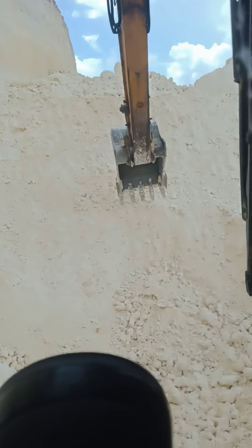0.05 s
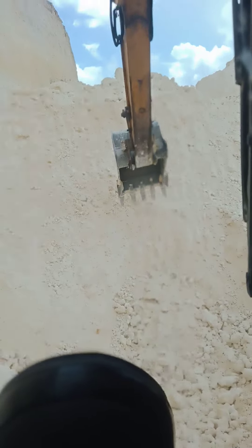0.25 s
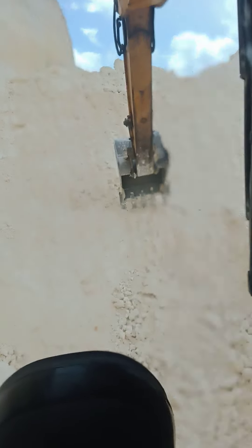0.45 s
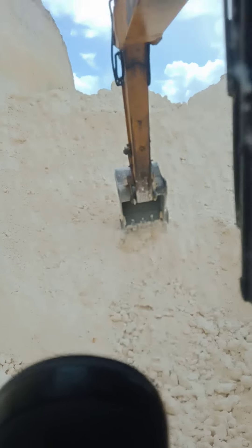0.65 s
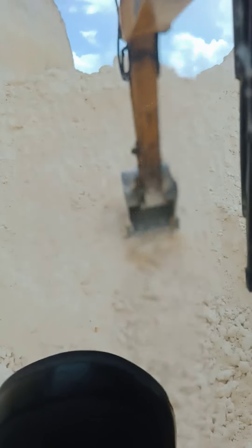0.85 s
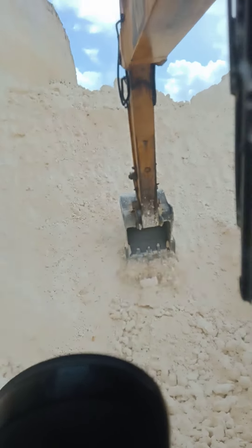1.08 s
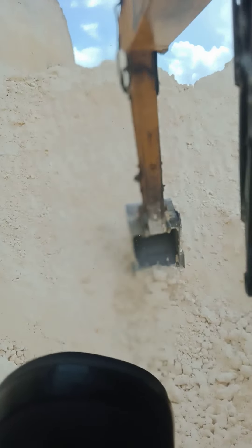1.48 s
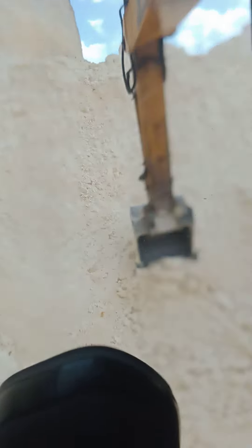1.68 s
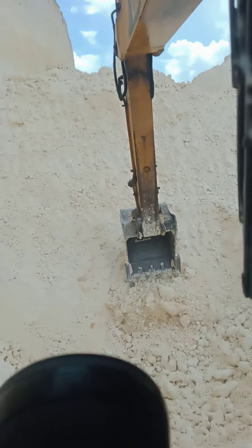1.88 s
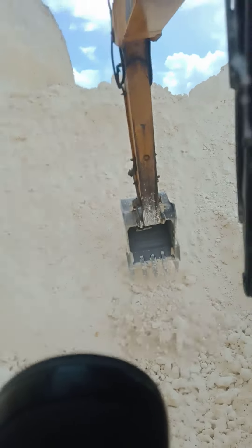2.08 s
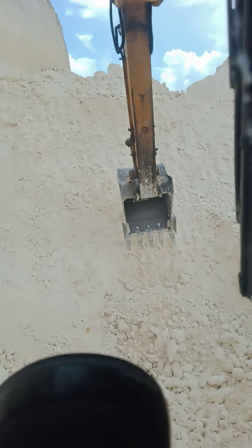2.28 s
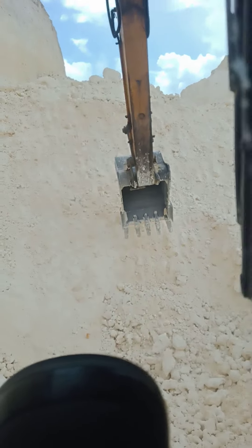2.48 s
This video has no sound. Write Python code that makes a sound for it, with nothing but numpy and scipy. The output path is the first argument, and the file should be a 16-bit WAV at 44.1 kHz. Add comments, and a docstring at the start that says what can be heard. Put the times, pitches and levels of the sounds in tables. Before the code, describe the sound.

Heard from inside the cab, a digger bucket scrapes into soil and stones while the diesel engine rumbles. Gravel crunches, lumps thud and steel clinks, with one loud clank, a short dip and a last slide of earth.

```python
"""An excavator bucket drags through loose stony earth, heard from the cab over the diesel engine.
Grit crunches, soil tumbles and sand ticks as the teeth bite; stones crack on the steel, clods thud.
A hard bite rings the teeth, a big rock clanks on the shell, a loose steel joint clinks now and then.
Near 1.9 s the digging and the engine briefly go quieter; a last slide of earth follows."""
import sys
import numpy as np
from scipy import signal
from scipy.fft import rfft, irfft, next_fast_len
from scipy.io import wavfile

SR = 44100
rng = np.random.default_rng(int(sys.argv[2]) if len(sys.argv) > 2 else 0)


def dump_mix(stems):
    """Bounce the given channels to the path in sys.argv[1] as a 16-bit WAV at rate SR."""
    frames = np.atleast_2d(stems).T  # one column per channel
    limited = np.clip(frames, -1, 1)  # hard clip at full scale
    pcm = np.round(limited * 32767).astype(np.int16)
    wavfile.write(sys.argv[1], SR, pcm)


N = 116865

# Spectra. Each row: frequency in Hz, relative density in dB.
ENGINE_SPECTRUM = [(20, -23), (45, -11.5), (85, 4.5), (130, -16), (180, -25), (260, -18.5), (500, -12.5),
                   (900, -18), (1600, -26), (3000, -38.5), (6300, -34), (7300, -57), (8400, -48),
                   (11000, -57), (13800, -50), (16000, -79)]
GROUND_SPECTRUM = [(15, -58), (28, -21), (38, 10.5), (70, 12), (95, 2), (135, 10.5), (175, -3), (400, -44),
                   (2500, -82)]
SOIL_SPECTRUM = [(60, -21.5), (170, -2), (230, 0.5), (330, 0), (420, -5), (500, -2), (660, -3.5),
                 (850, -4.5), (1300, -12), (2000, -17), (5000, -53), (10000, -69)]
GRIT_SPECTRUM = [(300, -44.5), (900, 5.5), (1500, 1), (2300, 0), (3500, -1), (4500, -3.5), (5900, 1.5),
                 (6600, -1.5), (7300, -19.5), (8600, -27), (10000, -44), (12000, -52), (14300, -30),
                 (16000, -58)]
SAND_SPECTRUM = [(4000, -15), (6200, 1), (7400, 9.5), (8500, 7.5), (9500, -6.5), (10300, -5),
                 (11500, -14.5), (12800, -7), (13800, 2), (14800, 3), (16000, -16)]
STONE_ON_STEEL_SPECTRUM = [(200, -19), (800, 16.5), (2000, 4.5), (4500, -1), (6200, 3.5), (7200, -7.5),
                           (8600, -14), (10000, -20), (12000, -36), (14300, -18), (16000, -22)]
# Engine tones. Each row: multiple of the firing rate, relative level in dB.
ENGINE_ORDERS = [(.5, -16), (1, 12), (2, -38.5)]
# Engine envelope. Each row: time in seconds, gain in dB.
ENGINE_GAIN = [(0, 2), (.4, 2), (1.85, 6), (1.93, -5), (2.03, -2), (2.1, 2), (2.65, -1.5)]
# Loose joint. Each row: ratio to the clink pitch, relative level in dB, T60 in seconds.
JOINT_MODES = [(1, -1.5, 0.099), (1.07, -4.5, 0.071), (.92, -12, 0.11)]
# Joint knocks. Each row: start in seconds, level in dB, pitch in Hz.
JOINT_CLINKS = [(.004, -41.5, 972), (.113, -39.5, 952), (.246, -34.5, 967), (0.33, -43, 1010),
                (.407, -32.5, 1000), (0.989, -39.5, 972), (1.606, -27.5, 1057), (2.228, -41.5, 1060),
                (2.477, -39, 1010)]
# Bucket steel. Each row: frequency in Hz, relative level in dB, T60 in seconds.
TEETH_MODES = [(1340, 0.5, 0.24), (2541, -7, 0.18), (2720, 1.5, 0.23), (2850, -9, .14), (3390, 3.5, 0.15),
               (3840, -7, 0.096)]
SHELL_MODES = [(985, 0, .07), (1060, -8, .05), (505, -12, .06)]
# Chips off the steel. Each row: start in seconds, level in dB.
FLYING_CHIPS = [(.092, -63), (.668, -70), (0.876, -46.5), (1.056, -51), (1.286, -51), (1.5, -61),
                (1.607, -51), (1.7, -57), (1.738, -49), (1.843, -67), (2.16, -54)]
# Clods and rocks landing. Each row: start in seconds, level in dB, pitch in Hz, decay in seconds.
CLOD_THUDS = [(.435, -33.5, 350, 0.051), (.48, -24, 111, 0.032), (.485, -33, 513, 0.038),
              (.553, -30.5, 268, .015), (.61, -26, 93.6, 0.044), (.616, -32.5, 516, .01),
              (.655, -27.5, 83, 0.016), (.675, -36, 244, 0.023), (.777, -23, 237, 0.013),
              (1.056, -29, 87, 0.044), (1.06, -34, 516, 0.024), (1.19, -28, 218, 0.024),
              (1.266, -29, 83.5, .04), (1.27, -32, 485, 0.027), (1.478, -39, 317, .015),
              (1.605, -28.5, 752, .02), (1.612, -23.5, 284, 0.029), (1.645, -28, 533, 0.05),
              (1.715, -34, 135, .025), (1.723, -29, 550, 0.029), (1.803, -29.5, 267, 0.01),
              (1.924, -33.5, 233, 0.019), (2.072, -39.5, 313, 0.031), (2.295, -42, 580, 0.019),
              (2.51, -43, 261, 0.014)]
# Stones breaking. Each row: start in seconds, level in dB, band centre in Hz, decay in seconds.
STONE_CRACKS = [(0.03, -52, 5450, 0.032), (.25, -47.5, 2560, 0.014), (.368, -50, 4630, 0.027),
                (0.563, -39.5, 3860, 0.013), (0.613, -31.5, 6140, 0.0056), (.641, -30.5, 3700, 0.011),
                (.661, -34, 2800, 0.019), (0.789, -43.5, 6200, 0.02), (0.8462, -39, 2500, 0.0056),
                (.877, -34.5, 4220, 0.013), (1.057, -31, 6530, 0.0089), (1.082, -31, 3900, 0.0069),
                (1.118, -37, 2080, 0.013), (1.175, -39.5, 6500, 0.017), (1.267, -28, 4200, 0.0038),
                (1.288, -33, 4500, 0.012), (1.393, -38, 6100, 0.0089), (1.413, -31, 1840, 0.014),
                (1.477, -42, 3830, 0.0087), (1.587, -37.5, 6550, 0.012), (1.607, -27.5, 1940, 0.0076),
                (1.643, -28, 4170, 0.013), (1.7204, -34, 5680, 0.039), (1.787, -40.5, 5000, 0.013),
                (2.028, -53.5, 4730, .012), (2.074, -45, 5700, 0.011), (2.123, -35.5, 3390, .017),
                (2.224, -50.5, 3500, 0.033), (2.358, -46.5, 5000, 0.0078), (2.58, -49.5, 2020, 0.014)]
# Dig envelopes. Each row: time in seconds, then grit, soil and ground levels in dB.
DIG_LEVELS = [(0, -62, -50.5, -51), (.2, -58, -51.5, -45), (.26, -67, -42.5, -54), (.32, -59, -48.5, -56),
              (0.421, -58.5, -47.5, -57), (.49, -41, -32.5, -33), (.57, -46, -40, -34.5),
              (.67, -41, -36, -51), (.73, -53, -42, -47), (.79, -42.5, -34, -42), (.89, -44, -35.5, -38),
              (1.01, -54, -43, -41), (1.1, -45, -41, -50), (1.19, -47, -35.5, -35.5),
              (1.31, -39, -36.5, -36), (1.38, -50, -41, -36), (1.42, -45, -35, -43),
              (1.52, -39, -32.5, -38), (1.585, -44, -37, -39.5), (1.63, -35, -34, -34),
              (1.75, -41.5, -33.5, -39), (1.8, -46.5, -36, -46), (1.883, -43.5, -36.5, -38),
              (1.913, -56.5, -46.5, -52), (2.0, -63, -51, -51), (2.06, -63, -43.5, -63),
              (2.09, -52, -36.5, -40.5), (2.15, -42.5, -40, -37), (2.21, -53.5, -47, -44),
              (2.25, -46.5, -39, -41), (2.31, -48, -40, -42), (2.37, -55.5, -43.5, -40),
              (2.43, -61, -46.5, -51), (2.51, -58, -44, -48), (2.59, -56.5, -45, -52),
              (2.65, -60, -50.5, -48)]
GRIT_COLUMN, SOIL_COLUMN, GROUND_COLUMN = 1, 2, 3


def amp(db):
    """Decibels to gain."""
    return 10 ** (np.asarray(db) / 20)


def unit(x):
    """Scale to rms 1."""
    return x / np.sqrt(np.mean(x ** 2) + 1e-20)


def add(mix, start_s, sound):
    """Mix a sound in at start_s."""
    part = mix[max(0, round(start_s * SR)):][:len(sound)]
    part += sound[:len(part)]


def colour(x, spectrum):
    """Minimum-phase filter with the given spectrum."""
    size = next_fast_len(len(x) + 4096)
    hz, db = np.transpose(spectrum)
    bin_hz = abs(np.fft.fftfreq(size, 1 / SR))
    log_gain = np.log(amp(np.interp(np.log(bin_hz + 1), np.log(hz), db)))
    response = np.exp(np.conj(signal.hilbert(log_gain)))
    return np.fft.ifft(np.fft.fft(x, size) * response).real[:len(x)]


def band(x, hz, q):
    """One resonance; centre and width capped at SR / 4."""
    return signal.lfilter(*signal.iirpeak(min(hz, SR / 4), max(q, hz / (SR / 4)), SR), x)


def drift(hz):
    """Random wander of rms 1, low-passed at hz."""
    rolloff = 1 + (np.fft.rfftfreq(N, 1 / SR) / hz) ** 4
    return unit(irfft(rfft(rng.standard_normal(N)) / rolloff, N))


def envelope(table, column=1):
    """Gain over time from a dB column."""
    rows = np.array(table)
    return amp(np.interp(np.arange(N) / SR, rows[:, 0], rows[:, column]))


def steel_ring(t, modes):
    """Struck steel: a sum of decaying sines."""
    return sum(amp(db - 60 * t / t60_s) * np.sin(2 * np.pi * hz * t) for hz, db, t60_s in modes)


def grains(per_s, spread_db, flurry_db, span_hz, q, bands):
    """Random small impacts; each pitch band has its own flurries."""
    out = np.zeros(N)
    knots = np.arange(0, N + 600, 600)
    for hz in np.geomspace(*span_hz, bands):
        sizes = amp(spread_db * np.minimum(rng.exponential(1, N), 3)) * rng.choice([-1, 1], N)
        flurry = amp(flurry_db * np.interp(np.arange(N), knots, rng.standard_normal(len(knots))))
        hits = rng.random(N) < per_s / bands / SR
        out += band(sizes * flurry * hits, hz, q) / np.sqrt(hz)
    return unit(out)


def cab(x, t60_s, wet_db, echoes_per_s=2000):
    """Add short reflections from the cab's glass and panels."""
    t = np.arange(SR // 4) / SR
    echoes = rng.standard_normal(len(t)) * (rng.random(len(t)) < echoes_per_s / SR)
    tail = echoes * (t > .002) * amp(-60 * t / t60_s)
    return x + amp(wet_db) * signal.fftconvolve(x, tail / np.linalg.norm(tail))[:N]


def engine(firing_hz=94.6, tone_db=-45.5, rattle_db=-49):
    """Diesel: wavering firing tone over a dull mechanical rattle."""
    cycles = np.cumsum(firing_hz * (1 + 0.031 * drift(hz=10.5))) / SR
    tone = sum(amp(db) * np.sin(2 * np.pi * (k * cycles + rng.random())) for k, db in ENGINE_ORDERS)
    rattle = unit(colour(rng.standard_normal(N) * amp(0.73 * drift(hz=50)), ENGINE_SPECTRUM))
    tone = unit(tone * amp(6.6 * drift(hz=23)))
    return envelope(ENGINE_GAIN) * (amp(tone_db) * tone + amp(rattle_db) * rattle)


def joint_clinks(rise_s=0.0018, grate_decay_s=0.013):
    """A slack steel joint knocks and grates with a short, rough ring."""
    t, out = np.arange(SR // 4) / SR, np.zeros(N)
    for start_s, db, hz in JOINT_CLINKS:
        ring = sum(amp(mode_db - 60 * t / t60_s) * np.sin(2 * np.pi * (hz * ratio * t + rng.random()))
                   for ratio, mode_db, t60_s in JOINT_MODES)
        noise = rng.standard_normal(len(t))
        grate = unit(band(band(noise, hz, q=12), hz, q=6.3)) * np.exp(-t / grate_decay_s)
        add(out, start_s, amp(db) * (ring + 0.56 * grate) * np.minimum(t / rise_s, 1))
    return out


def teeth_ring(start_s=.643, level_db=-39):
    """The first hard bite rings the bucket teeth."""
    t, out = np.arange(SR // 3) / SR, np.zeros(N)
    add(out, start_s, amp(level_db) * steel_ring(t, TEETH_MODES))
    return out


def shell_clank(start_s=1.679, level_db=-17.5, rise_s=0.0034):
    """One big rock drops on the bucket shell."""
    t, out = np.arange(SR // 6) / SR, np.zeros(N)
    add(out, start_s, amp(level_db) * steel_ring(t, SHELL_MODES) * np.minimum(t / rise_s, 1))
    return out


def sand(re_grit_db=-20.5, chip_decay_s=0.0094):
    """Sand ticks as it slides over the steel; a few sharper chips fly off."""
    t = np.arange(SR // 10) / SR
    ticks = grains(per_s=1700, spread_db=-0.5, flurry_db=3.5, span_hz=(6000, 15100), q=3.5, bands=8)
    slide = unit(colour(ticks * amp(3.5 * drift(hz=30)), SAND_SPECTRUM))
    out = amp(re_grit_db) * slide * envelope(DIG_LEVELS, GRIT_COLUMN)
    for start_s, db in FLYING_CHIPS:
        chip = unit(colour(rng.standard_normal(len(t)), SAND_SPECTRUM))
        add(out, start_s, amp(db) * chip * np.exp(-t / chip_decay_s))
    return out


def clod_thuds(rise_s=0.0086):
    """Heavy lumps land with a damped boom and a crumbling rush."""
    t, out = np.arange(SR // 3) / SR, np.zeros(N)
    for start_s, db, hz, decay_s in CLOD_THUDS:
        shape = np.minimum(t / rise_s, 1) * np.exp(-np.maximum(t - rise_s, 0) / decay_s)
        rush = shape * band(band(rng.standard_normal(len(t)), hz, q=1.37), hz, q=1.37)
        boom = shape * np.sin(2 * np.pi * hz * t)
        shape_rms = np.sqrt(np.mean(shape ** 2))
        add(out, start_s, amp(db) * unit(unit(rush) + 0.36 * unit(boom)) * shape_rms)
    return out


def stone_cracks(rise_s=0.00073):
    """Each stone breaks in a shower of snaps, coloured by its own resonances."""
    t, out = np.arange(SR // 5) / SR, np.zeros(N)
    for start_s, db, hz, decay_s in STONE_CRACKS:
        snaps, sizes = rng.standard_normal((2, len(t)))
        shower = band(snaps * amp(5.3 * sizes), hz, q=0.72)
        body = sum(band(shower, hz * ratio, q=22) for ratio in rng.uniform(.55, 1.4, 5))
        burst = unit(colour(unit(shower) + .7 * unit(body), STONE_ON_STEEL_SPECTRUM))
        add(out, start_s, amp(db) * burst * np.minimum(t / rise_s, 1) * np.exp(-t / decay_s))
    return out


def pebble_clacks(per_s=280, spread_db=3.2, t60_s=.045, candidates=900):
    """Pebbles knock together, each with four short random modes."""
    t, out = np.arange(SR // 16) / SR, np.zeros(N)
    for position, chance, size, *pitches in rng.random((candidates, 7)):
        if chance < per_s * N / SR / candidates:
            modes_hz = 1100 + 6000 * np.array(pitches)[:, None] ** 1.2
            ring = np.sin(2 * np.pi * modes_hz * t).sum(0) * amp(-60 * t / t60_s)
            size_db = spread_db * min(-np.log(size), 2.5)
            add(out, position * N / SR, ring * amp(size_db))
    return unit(out)


def digging():
    """The bucket drags: grit crunches and soil tumbles in shared clumps; the ground rumbles."""
    clumps = drift(hz=41.7)
    fines = grains(per_s=5500, spread_db=0, flurry_db=6.5, span_hz=(1034, 15300), q=5.4, bands=22)
    crunch = fines * amp(1.5 * clumps) + .55 * pebble_clacks()
    grit = unit(colour(crunch, GRIT_SPECTRUM)) * envelope(DIG_LEVELS, GRIT_COLUMN)
    crumbs = grains(per_s=3600, spread_db=2, flurry_db=2.73, span_hz=(171.5, 2100), q=5.7, bands=20)
    tumble = colour(crumbs, SOIL_SPECTRUM) * amp(0.84 * clumps)
    soil = unit(tumble) * envelope(DIG_LEVELS, SOIL_COLUMN)
    rumble = colour(rng.standard_normal(N), GROUND_SPECTRUM)
    ground = unit(rumble) * envelope(DIG_LEVELS, GROUND_COLUMN)
    return cab(grit, t60_s=0.039, wet_db=-8.5) + soil + ground


def scene():
    """Mono mix of earth, steel and engine; grit, cracks and sand echo in the cab."""
    earth = digging() + cab(stone_cracks() + sand(), t60_s=0.029, wet_db=-9) + clod_thuds()
    steel = teeth_ring() + shell_clank() + joint_clinks()
    return (earth + steel + engine())[None]


def record(dry):
    """Low-pass at 15.85 kHz."""
    lowpass = signal.firwin(511, 15850, window=("kaiser", 9), fs=SR)
    return signal.oaconvolve(dry, lowpass[None], "same")


dry = scene()
out = record(dry)
dump_mix(out)
```